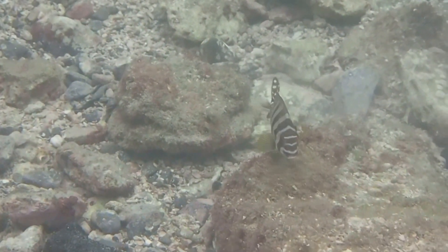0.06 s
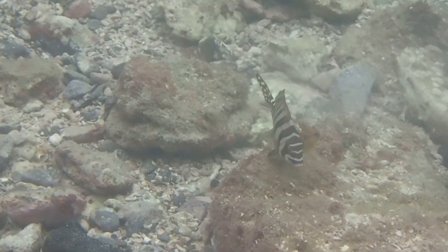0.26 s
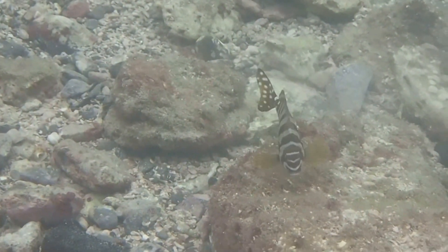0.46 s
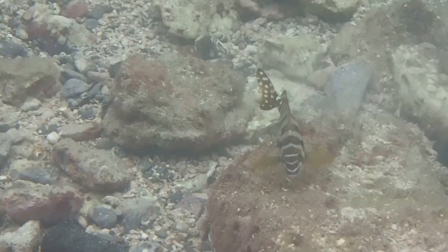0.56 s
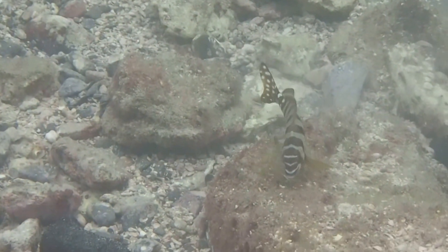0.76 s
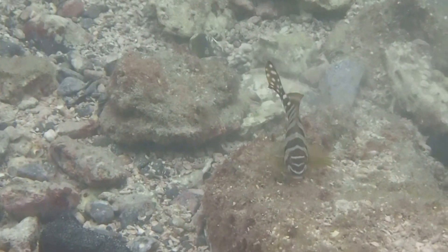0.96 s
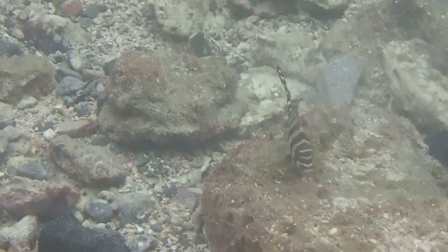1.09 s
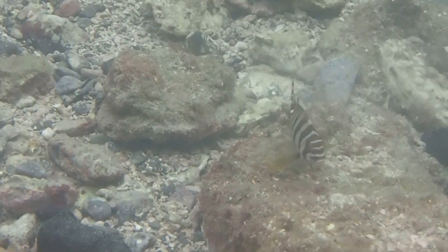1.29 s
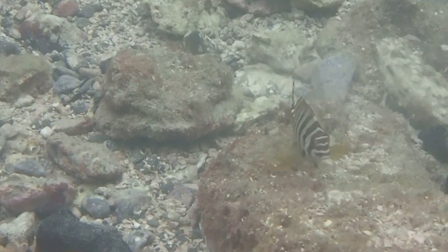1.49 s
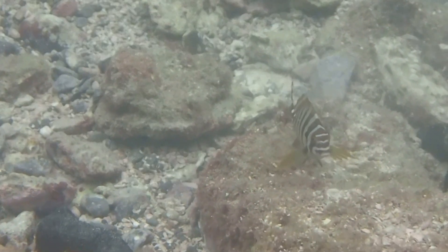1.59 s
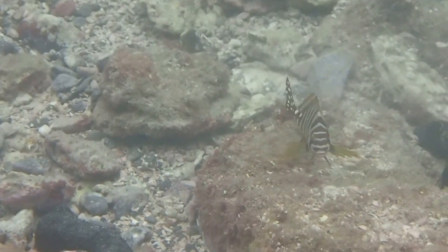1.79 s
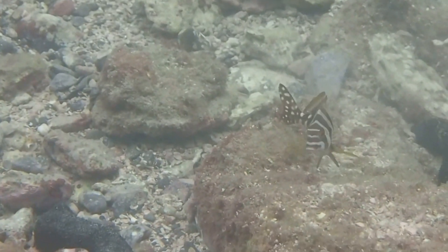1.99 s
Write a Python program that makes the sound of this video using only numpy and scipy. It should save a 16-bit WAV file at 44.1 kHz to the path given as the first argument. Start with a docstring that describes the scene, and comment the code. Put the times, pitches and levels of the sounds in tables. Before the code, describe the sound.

A small fish croaks underwater over a rocky seabed. It knocks once at 0.1 seconds, drums a rapid, even roll of hollow pulses until 1.6 seconds, and knocks a last time near 1.7. Two dull bumps on the microphone housing come at about 0.2 and 0.3 seconds. Shrimps click faintly throughout, with the sharpest snap just after 1 second, over the soft steady hiss of shallow water.

```python
"""Under water over a rocky seabed, a small fish croaks: one lone knock, a drum roll of thirty pulses
a second, a last knock. Two muscles, one strong and one weak, take turns to tug its swim bladder
(a bag of gas in its body), which rings like a drum. Shrimps snap here and there and make the camera
housing ring. Two dull bumps on the housing and the steady hiss of the shallows lie underneath."""
import sys
import numpy as np
from scipy import signal
from scipy.fft import rfft, irfft
from scipy.io import wavfile

SR = 44100
rng = np.random.default_rng(int(sys.argv[2]) if len(sys.argv) > 2 else 0)


def store_pcm(level_fs):
    """Save levels as 16-bit WAV."""
    pcm = np.round(np.clip(level_fs, -1, 1) * 32767).astype(np.int16)
    wavfile.write(sys.argv[1], SR, np.atleast_2d(pcm).T)


N = 90404


def undb(db):
    """Turn decibels into a number to multiply by."""
    return 10 ** (np.asarray(db) / 20)


def stereo(x, pan_db):
    """Make the left side pan_db louder than the right."""
    return x * undb(np.array([[pan_db], [-pan_db]]) / 2)


def fade(t, t60):
    """Die away, losing 60 dB over the fade time t60, in seconds."""
    return np.exp(-np.log(1000) * t / t60)


def add(out, start, x):
    """Mix a short sound in at its start time, in seconds."""
    i = max(int(round(start * SR)), 0)
    part = x[..., :max(N - i, 0)]
    out[..., i:i + part.shape[-1]] += part


def noise(points):
    """Noise of standard strength (rms 1), its tone shaped by (f/Hz, level/dB) points."""
    hz, db = np.array(points, float).T
    f = np.maximum(np.fft.rfftfreq(N, 1 / SR), 1)
    gain = undb(np.interp(np.log(f), np.log(hz), db))
    shaped = irfft(rfft(rng.standard_normal(N)) * gain, N)
    return shaped / shaped.std()


def low_cut(x, hz):
    """Turn down steeply everything lower than hz."""
    f = np.maximum(np.fft.rfftfreq(N, 1 / SR), 1)
    return irfft(rfft(x) / np.sqrt(1 + (hz / f) ** 10), N)


def water():
    """The shallows hiss steadily, wavering a little in loudness."""
    # tone of the hiss that both sides share: f/Hz, relative level/dB
    shared_tone = [(15, -48), (25, -3.5), (70, -4.5), (144, -2.5), (179, -7.5), (228, 3.5), (316, -1.5),
                   (1320, -8.5), (1730, -10.5), (1930, -11.5), (2090, -11), (3050, -13), (8490, -21.5),
                   (11100, -23.5), (15800, -28.5)]
    # tone of the hiss that sets left and right apart: f/Hz, relative level/dB
    side_tone = [(15, -33), (25, -22), (161, -13), (261, -14), (361, -9), (392, -20), (473, -6), (513, -18),
                 (1280, -11.5), (1470, -17), (2090, -17), (3130, -20.5), (15800, -35)]
    turning_points = np.linspace(0, N, 25)
    waver_db = 1.66 * np.interp(np.arange(N), turning_points, rng.standard_normal(len(turning_points)))
    shared = undb(-53 + waver_db) * noise(shared_tone)
    side = undb(-53.5) * noise(side_tone)
    return stereo(np.array([shared + side, shared - side]), pan_db=0.2)


def bumps():
    """Soft bumps on the housing each ring one note that dies quickly."""
    # dull bumps: t/s, f/Hz, level/dB, fade time/s, left minus right/dB
    hits = [(.2272, 1114, -17.5, 0.013, 12.5), (0.3178, 173, -28, .028, 1)]
    t = np.arange(SR // 10) / SR
    onset = 1 - np.exp(-(t / .0008) ** 2)
    out = np.zeros((2, N))
    for start, hz, db, t60, pan_db in hits:
        ring = np.sin(2 * np.pi * hz * t) * fade(t, t60) * onset
        add(out, start, stereo(undb(db) * ring, pan_db))
    return out


def housing_ring(t, low_db, high_db):
    """The housing rings with several notes at once, a little differently at each microphone."""
    # the housing's own notes: f/Hz, relative level/dB, fade time/s
    notes = [(2960, 0, .018), (3410, -2, .014), (4300, 0, .014), (4590, -9, .012), (5030, -6, .012),
             (5600, -13, .012), (8060, -18, .009)]
    ring = 0
    for hz, db, t60 in notes:
        phase = 2 * np.pi * rng.random() + 0.82 * rng.standard_normal((2, 1))
        gain = undb(db + (low_db if hz < 3700 else high_db))
        ring = ring + gain * np.sin(2 * np.pi * hz * t + phase) * fade(t, t60)
    return ring * (1 - fade(t, .002))  # builds up over 2 ms


def shrimps():
    """Near snaps crack and ring the housing; far ones only make it tick faintly."""
    # near snaps, with relative levels: t/s, crack level/dB, low ring level/dB, high ring level/dB,
    # left minus right/dB, brightest f/Hz
    snaps = [(0.0126, -58, -50.5, -61, 0.5, 7100), (0.2265, -44, -43, -59, 3, 7840),
             (0.245, -50.5, -51, -59, 0.0, 7780), (0.354, -59, -70, -61, 1.5, 7500),
             (0.37, -49, -52, -42, 5, 7740), (0.4746, -49, -69, -62, 3, 7400),
             (0.5356, -53, -54, -52.5, 6, 7930), (0.6491, -44, -48.5, -50.5, 4, 12000),
             (0.7444, -59, -57, -53, 8, 6810), (0.8334, -54, -46, -69, 1.5, 6910),
             (0.9643, -56, -50, -67, 0.0, 6930), (0.9906, -52, -59, -64, 3, 8610),
             (1.0504, -34.5, -29.5, -30, 2.5, 8090), (1.439, -48, -58, -58, 1.0, 8300),
             (1.6295, -47, -67, -67, 11, 8790), (1.8915, -57, -76, -72, 1.0, 7770),
             (1.964, -46, -67, -65, 0.5, 11000)]
    # tone of a crack: f/Hz, relative level/dB
    crack_tone = [(1500, -30), (3000, -6), (5300, -2), (7000, -7), (8800, -4.5), (11500, -10), (14300, -6),
                  (16000, -15)]
    delay_s, far_snaps_per_s = .0009, 110
    t = np.arange(SR // 25) / SR
    out = np.zeros((2, N))
    hiss = np.array([noise(crack_tone), noise(crack_tone)])
    for start, crack_db, low_db, high_db, pan_db, bright_hz in snaps:
        i = rng.integers(N - len(t))
        crack = undb(crack_db - 5) * hiss[:, i:i + len(t)] * fade(t, t60=0.0098)
        bright = signal.lfilter(*signal.iirpeak(bright_hz, Q=3.5, fs=SR), crack)
        snap = crack + undb(6) * bright + undb(7.5) * housing_ring(t, low_db, high_db)
        add(out, start + delay_s, stereo(snap, pan_db))
    for start in rng.random(int(far_snaps_per_s * N / SR)) * N / SR:
        low_db, high_db = -59 + 2 * rng.standard_normal(2)
        add(out, start, housing_ring(t, low_db, high_db - 15))
    return low_cut(out, hz=2650)


def bladder_pulse(t, db, muscle, second_note_db, lead_s):
    """One soft tug rings all the swim bladder's notes; a harder tug sounds crisper."""
    # the bladder's own notes: f/Hz, strong-muscle level/dB, weak-muscle level/dB, fade time/s
    notes = [(266.2, -31.5, -34, 0.12), (390, -31, -31.5, 0.051), (502.8, -36, -33.5, 0.077),
             (585.8, -27, -29, 0.048), (743.4, -13, -17.5, 0.028), (924.6, -9, -12, 0.02),
             (1320, -26, -22, 0.0081), (1967, -25.5, -23.5, 0.022), (2174, -24.5, -19, 0.06)]
    notes = np.array(notes, float)
    hz = notes[:, 0] * (1 + 0.0048 * rng.standard_normal(len(notes)))  # no two tugs are quite alike
    gain = undb(db + notes[:, 1 + muscle] + 0.95 * rng.standard_normal(len(notes)))
    gain *= np.sign(850 - hz)  # notes above 850 Hz swing against those below
    gain[1] *= undb(second_note_db)
    direction = 1 if muscle else -1  # the two muscles pull opposite ways
    waves = np.sin(2 * np.pi * hz[:, None] * t) * fade(t, notes[:, 3:])
    ring = direction * gain @ waves
    softness_s = .00022 * np.exp(-0.2223 * db)
    tug = np.exp(-.5 * (np.arange(-lead_s, lead_s, 1 / SR) / softness_s) ** 2)
    return signal.fftconvolve(ring, tug / tug.sum())


def fish():
    """Muscles drum on the swim bladder; the pulses echo off the surface and faintly off the rocks."""
    # muscle twitches, with relative levels: t/s, level/dB, muscle (0 strong, 1 weak),
    # after-ring level/dB, boost of the bladder's second note/dB
    twitches = [(0.105, 2, 0, -38, -11), (0.162, 0.5, 1, -33, 1), (0.1953, 0.6, 0, -32, 1.5),
                (0.2283, 0, 1, -41.5, -15), (0.2623, 0.5, 0, -28.5, 0), (0.2946, 0.0, 1, -60, -5),
                (0.3287, 0, 0, -43, -1), (0.3622, 0, 1, -33, 3), (0.3953, 0, 0, -38, -0.5),
                (0.4287, -0.5, 1, -37, 4.5), (0.4624, 0.5, 0, -47, -3), (0.4952, -0.2, 1, -31, 1),
                (0.5292, 0.5, 0, -36, 0.5), (0.5622, 0, 1, -36, 1.5), (0.5954, 0.6, 0, -32, 0.0),
                (0.6285, 0, 1, -33.5, 1.5), (0.662, 0.16, 0, -35, 1.5), (0.6954, 0.2, 1, -44, 0),
                (0.7281, -0.5, 0, -30.5, 4.5), (0.7611, 0, 1, -42, -5), (0.7955, 0.5, 0, -41, -0.5),
                (0.829, -0.5, 1, -38, 3), (0.8631, 0.6, 0, -44, -3.5), (0.8957, 0.0, 1, -39.5, -1),
                (0.929, 0.5, 0, -39, -0.5), (0.9617, 0.07, 1, -31.5, 4), (0.9956, 0, 0, -40, 2),
                (1.029, -1, 1, -32.5, 4), (1.0629, 0.5, 0, -46.5, -2), (1.0958, -0.04, 1, -32, 1),
                (1.129, 0.65, 0, -39, 0), (1.1631, -1, 1, -35, 4), (1.1964, 0.77, 0, -35.5, -4.5),
                (1.2291, -0.5, 1, -34.5, 1), (1.2632, 1, 0, -35, -2), (1.2962, -0.14, 1, -33, 3),
                (1.3299, 0.73, 0, -35, 0), (1.3636, -0.2, 1, -37, 2), (1.3966, 0.1, 0, -31, 1.5),
                (1.4297, -0.43, 1, -45, -15), (1.4637, 0.28, 0, -35, -6), (1.4967, -0.34, 1, -39.5, 2.5),
                (1.5298, -0.15, 0, -32, 2.5), (1.5636, -0.1, 1, -35.5, -4), (1.5968, 0.55, 0, -38, -1),
                (1.6818, 0.5, 0, -39.5, -3.5)]
    after_hz, after_delay_s, after_rise_s = 859.7, 0.0094, 0.009
    lead_s, echo_s, left_lag_s = .001, 0.00535, .00002  # a tug starts lead_s ahead of its peak
    t = np.arange(SR // 6) / SR
    # the bladder swells into a short after-ring as the muscle lets go
    swell = (t / after_rise_s) ** 2 * np.exp(1 - (t / after_rise_s) ** 2)
    after_ring = swell * np.sin(2 * np.pi * after_hz * t)
    pulses, after_rings = np.zeros(N), np.zeros(N)
    for start, db, muscle, after_db, second_note_db in twitches:
        add(pulses, start - lead_s, bladder_pulse(t, db, muscle, second_note_db, lead_s))
        add(after_rings, start + after_delay_s, undb(after_db + 1.5) * after_ring)
    w = 2 * np.pi * np.fft.rfftfreq(N, 1 / SR)
    surface_echo = undb(-14) * np.exp(-1j * w * echo_s)  # this factor delays a sound by echo_s
    scatter = rng.standard_normal(len(t)) * fade(t, t60=.04)
    rock_echoes = undb(-21) * rfft(scatter / np.linalg.norm(scatter), N)
    spectrum = rfft(pulses) * (1 + surface_echo + rock_echoes) + rfft(after_rings)
    left = irfft(spectrum * np.exp(-1j * w * left_lag_s), N)
    right = irfft(spectrum, N)
    croak = low_cut(np.array([left, right]), hz=231)
    return undb(-0.5) * stereo(croak, pan_db=1.17)


def scene():
    """Everything heard at the housing."""
    return water() + fish() + bumps() + shrimps()


def record(dry):
    """The camera cuts off the highest treble."""
    top_hz = 15800
    return signal.sosfilt(signal.ellip(10, .2, 70, top_hz, fs=SR, output="sos"), dry)


dry = scene()
out = record(dry)
store_pcm(out)
```